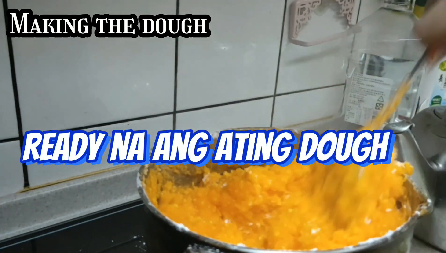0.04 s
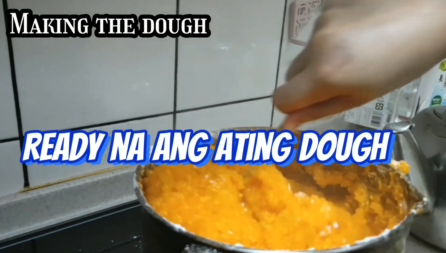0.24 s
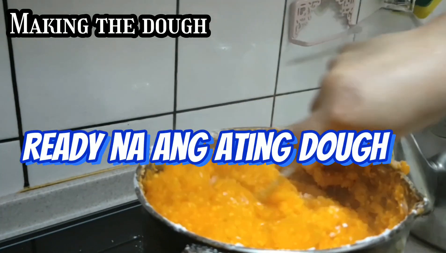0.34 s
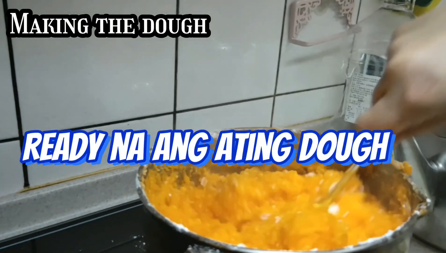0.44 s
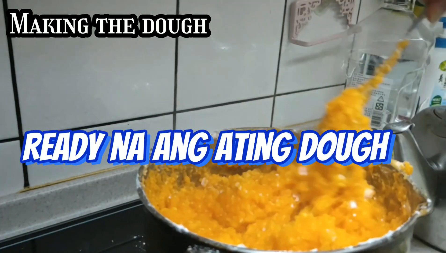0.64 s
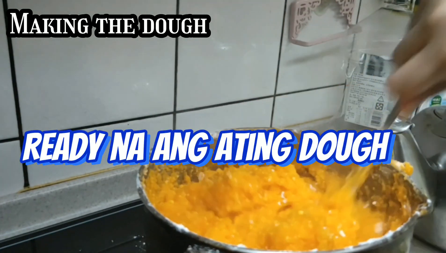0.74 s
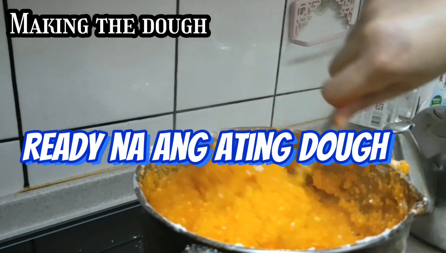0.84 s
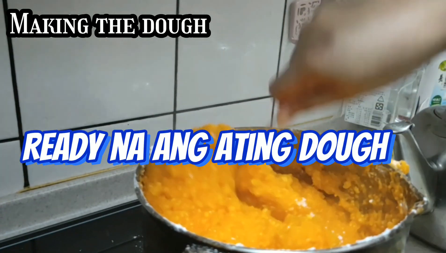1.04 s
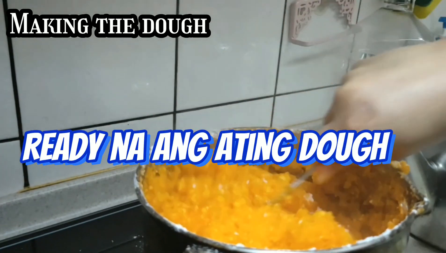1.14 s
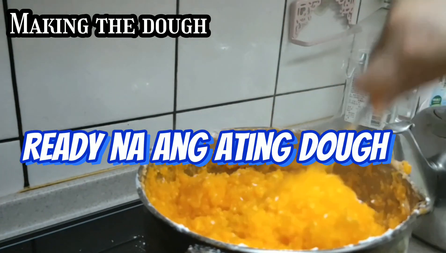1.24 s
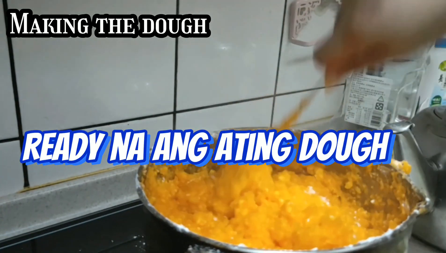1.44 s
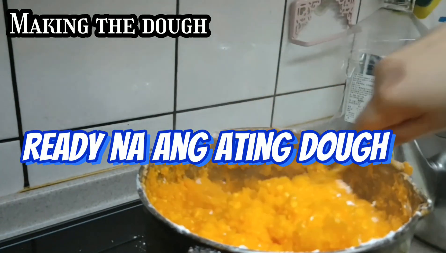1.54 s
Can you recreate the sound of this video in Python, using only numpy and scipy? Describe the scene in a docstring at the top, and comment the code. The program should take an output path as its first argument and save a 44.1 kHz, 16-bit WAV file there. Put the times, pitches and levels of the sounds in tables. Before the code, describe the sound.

A metal spoon stirs stiff dough in a steel pot, close and slightly left. Faint hum and rustle lead to a hard, damped clank at 0.24 s, then duller knocks at 0.3 and 0.4 and a weak pair near 0.57. A bright scrape at 0.76 precedes another hard clank at 0.89; double knock with scraping near 1.19, soft thumps from 1.33, then faint scraping. Short tiled kitchen tail, low rumble.

```python
"""Low hum and soft chatter, then hard knocks: a metal spoon stirs stiff dough in a steel pot on a stove,
close to a phone and a little to its left. Struck modes of the dough-damped wall ring short, the pot
thumps on its stand and short noise bands crunch at the rim; random clicks make the chatter.
Denser clicks through resonances scrape the steel, hum in the pot and rustle in the sticky dough.
Noise makes a brief tail from the small tiled kitchen, low rumble and faint hiss."""
import sys
import numpy as np
from scipy import signal
from scipy.fft import rfft, irfft, next_fast_len
from scipy.io import wavfile

SR = 44100
rng = np.random.default_rng(int(sys.argv[2]) if len(sys.argv) > 2 else 0)


def volts_from_decibels(level):
    """Turn decibel levels (scalar or array-like) into linear amplitude factors."""
    exponent = np.asarray(level, float) / 20
    return 10 ** exponent


def bounce(signal):
    """Save signal as a 16-bit WAV file at the path given by the first command-line argument."""
    frames = np.transpose(np.atleast_2d(signal))
    limited = np.clip(frames, -1, 1)
    pcm = np.round(limited * 32767).astype(np.int16)
    wavfile.write(sys.argv[1], SR, pcm)


N = 70560

# Ring of the pot wall. Each row: nominal mode pitch in Hz, relative level in dB, t60 in s.
WALL_MODES = [(404, -1.5, 0.09), (526, 0, 0.085), (565, -4, 0.035), (650, -10, 0.07), (820, -7, 0.06),
              (905, -6, 0.06), (980, -1, 0.04), (1075, -2, 0.045), (1145, -3.5, 0.051), (1210, 0, 0.045),
              (1320, -4, 0.048), (1490, -7, .045), (1760, -4, .022), (2080, 0, .025)]
# Thump of the full pot on its stand. Each row: nominal mode pitch in Hz, relative level in dB, t60 in s.
STAND_MODES = [(88.4, -9, 0.019), (102.5, 0, 0.21), (116.2, 10, 0.089), (143.4, 4.5, 0.17),
               (193, 1.5, 0.093), (248.4, 2.5, 0.091), (272.2, -5, 0.24), (331, 4.5, 0.095)]
# Treble resonances of steel and dough. Each row: centre in Hz, width in Hz, relative level in dB.
TREBLE_PEAKS = [(5840, 1700, 13.5), (6510, 460, 11.5), (7360, 770, 19), (7360, 770, -9), (10600, 3700, -49),
                (14600, 1300, 8)]
# How much louder each layer stands at the left than at the right. Each entry: layer name, dB.
LEFT_OVER_RIGHT = {"thump": 3.5, "wall": 9.5, "clink": 3.5, "scrape": 3, "stir": 3.5, "drag": 4}


def unit(x):
    """Scaled to rms 1."""
    return x / np.sqrt(np.mean(x ** 2))


def fade(t, t60):
    """Exponential decay: falls 60 dB in t60 s."""
    return volts_from_decibels(-60 * t / t60)


def band(x, lo_hz, hi_hz):
    """Band-pass."""
    return signal.sosfilt(signal.butter(3, [lo_hz, min(hi_hz, .45 * SR)], "band", fs=SR, output="sos"), x)


def peaks(x, table):
    """Sum of resonances driven by x, scaled to rms 1."""
    out = 0
    for hz, width_hz, db in table:
        resonance = signal.lfilter(*signal.iirpeak(hz, hz / width_hz, fs=SR), x)
        out = out + volts_from_decibels(db) * resonance * np.sqrt(1 / width_hz)
    return unit(out)


def pan(left_db):
    """Left and right gains, left_db apart."""
    return volts_from_decibels(np.array([[left_db], [-left_db]]) / 2)


def grit(per_s, spread_db, size=N):
    """Random clicks of either sign; their levels in dB spread exponentially."""
    chance, height = rng.random((size, 2)).T
    level = volts_from_decibels(-spread_db * np.log(height + 1e-9))
    return (chance < per_s / SR) * level * rng.choice([-1., 1.], size) * np.sqrt(SR / per_s)


def pair(make, alike):
    """Two channels that share part of their chance."""
    c = np.clip(alike, 0, 1)
    mid, side = make(), make()
    return np.sqrt((1 + c) / 2) * mid + np.sqrt((1 - c) / 2) * side * np.array([[1], [-1]])


def wide(table, k):
    """Modes as resonances for a steady drive; width in Hz times t60 is k."""
    return [(hz, k / t60, db) for hz, db, t60 in table]


def favour(table, at_hz, off_db, db=0.):
    """The modes raised by db, and weaker by up to off_db away from at_hz."""
    reach_oct = .22
    out = []
    for hz, mode_db, t60 in table:
        away = 1 - np.exp(-(np.log2(hz / at_hz) / reach_oct) ** 2)
        out.append((hz, mode_db + db + off_db * away, t60))
    return out


def ring(table, left_db, unlike_rad, swell_s, whole):
    """Two-channel response of decaying modes, struck at a new place each time."""
    level_scatter_db, pitch_scatter, phase_scatter_rad = 1., .008, .35  # pitch scatter is a fraction
    hz, db, t60 = np.array(table).T[:, :, None]
    level, pitch, between, phase = rng.standard_normal((len(table), 4)).T[:, :, None]
    t = np.arange(SR // 4) / SR
    body = volts_from_decibels(db + level_scatter_db * level) * fade(t, t60) * (1 - np.exp(-t / swell_s))
    w = 2 * np.pi * hz * (1 + pitch_scatter * pitch)
    out = []
    for side in (-1, 1):
        start = phase_scatter_rad * phase + side * unlike_rad * between / 2
        out.append((body * np.sin(w * t + start)).sum(axis=0))
    return np.array(out) * pan(left_db) / np.sqrt(np.sum(volts_from_decibels(np.array(whole)[:, 1]) ** 2))


def crunch():
    """Spoon on rim: modes too dense to tell apart, a fast-dying band of noise for each cluster."""
    # Clusters of modes. Each row: centre in Hz, width in Hz, relative level in dB, t60 in s.
    clusters = [(1567, 530, 3.5, 0.038), (2010, 514, 10, 0.024), (2670, 220, 0, 0.03),
                (3163, 280, 0, 0.038), (4270, 1300, -5, 0.052), (5054, 520, -1.5, 0.036),
                (6280, 590, -2.5, 0.032), (7000, 370, 2.5, 0.03), (7790, 1700, -3, 0.023),
                (11200, 3900, -19, 0.051), (13300, 2230, -28, 0.045)]
    t = np.arange(SR // 4) / SR
    noise = pair(lambda: rng.standard_normal(len(t)), 0.33)
    out = 0
    for hz, width_hz, db, t60 in clusters:
        out = out + volts_from_decibels(db) * unit(band(noise, hz - width_hz / 2, hz + width_hz / 2)) * fade(t, t60)
    return out * np.clip(t / 0.00027, 0, 1) * pan(LEFT_OVER_RIGHT["clink"]) / 2


def knocks():
    """Each blow and the chatter of clicks after it ring wall, stand and rim."""
    # Blows of the spoon. Each row: start in seconds, level in dB, then relative levels in dB of thump,
    # upper wall modes, crunch and chatter, chatter t60 in s, then the pitches favoured in the thump,
    # the lower wall and the upper wall in Hz.
    blows = [(-.01, -53, 5, -2, -9, -3.5, 0.22, 250, 405, 990),
             (0.2389, -13.5, -9, -0.5, -8.5, -23.5, 0.19, 303, 573, 1376),
             (0.3033, -41, 8, -2, -18, -1, 0.037, 264, 405, 920),
             (0.3066, -24.5, 5, 1.5, -10.5, -11.5, 0.11, 277, 520, 1230),
             (0.3933, -23.5, 3.5, 2, -26.5, -10, 0.053, 172.4, 530, 1090),
             (0.5642, -34, 8, 4, -15, -24, 0.085, 250, 405, 930),
             (0.571, -40.5, 4.5, -3, -12, -12, .12, 320, 405, 1410),
             (.774, -47, -2, -25, -21, 3, 0.11, 151, 564, 1800),
             (0.8883, -13, -10, 1, -4.5, -27, 0.12, 138, 450, 1066),
             (.927, -38.5, -5, 3, -12, 11, 0.035, 260, 527, 980),
             (0.9333, -28.5, 13.5, 10, -27.5, -26, 0.22, 264, 527, 870),
             (1.1842, -30, -46, 3.5, -19, -16.5, 0.082, 120, 524, 1210),
             (1.188, -23, -7.5, 0, -21, -8, 0.032, 123.6, 405, 1200),
             (1.209, -38.5, 8.5, 9.5, -34, -5.5, 0.049, 107, 545, 900),
             (1.3257, -39.5, 12.5, -18, -26, -19.5, 0.096, 265, 405, 934),
             (1.353, -48, 9, -26.5, -26, -21, 0.093, 265, 405, 930),
             (1.374, -55, 13, -26, -29, -13.5, 0.067, 247, 405, 930)]
    split_hz = 730  # between lower and upper wall modes
    lower = [m for m in WALL_MODES if m[0] < split_hz]
    upper = [m for m in WALL_MODES if m[0] > split_hz]
    lead = SR // 10  # room for a blow before time zero
    out = np.zeros((2, N + SR))
    t = np.arange(SR // 3) / SR
    for (s, db, thump_db, upper_db, crunch_db, chatter_db, chatter_t60,
         thump_hz, lower_hz, upper_hz) in blows:
        modes = favour(lower, lower_hz, -5) + favour(upper, upper_hz, -10, upper_db)
        chatter = volts_from_decibels(chatter_db) * grit(2500, 3.23, size=len(t)) * fade(t, chatter_t60)
        chatter = chatter / np.sqrt(SR * 0.0015)
        blow = t == 0
        wall = ring(modes, LEFT_OVER_RIGHT["wall"], 0.68, 0.0006, WALL_MODES)
        bright = wall + volts_from_decibels(crunch_db) * crunch()
        # the heavy stand answers late: a slower swell
        stand_modes = favour(STAND_MODES, thump_hz, -12)
        thump = ring(stand_modes, LEFT_OVER_RIGHT["thump"], 0.25, 0.0022, STAND_MODES)
        y = signal.fftconvolve(bright, (blow + chatter)[None], axes=1)
        # chatter drives the stand 1 dB harder than the wall
        y = y + volts_from_decibels(thump_db) * signal.fftconvolve(thump, (blow + volts_from_decibels(1) * chatter)[None], axes=1)
        i = lead + int(s * SR)
        out[:, i:i + y.shape[1]] += volts_from_decibels(db) * y[:, :out.shape[1] - i]
    return out[:, lead:lead + N]


def stirring():
    """The drag shakes the pot on its stand, hums in the wall and tears the sticky dough: filtered clicks."""
    # Course of the stirring. Each row: time in seconds, then levels in dB of the stand's rumble,
    # the pot's lower hum, its upper hum, the rustle of the dough and the treble of that rustle.
    course = np.array([(0, -80, -53.5, -56.5, -65.5, -65.5), (0.069, -65.5, -71.5, -64.5, -62, -60.5),
                       (.11, -71, -97, -80, -59, -59.5), (0.218, -78, -69.5, -90, -62.5, -57.5),
                       (.3, -50, -52, -53, -71, -63), (.38, -60, -60, -59, -61.5, -61),
                       (.42, -55, -56, -56, -61, -75), (0.453, -54, -57, -61, -55, -76),
                       (.51, -57, -48.5, -61, -68, -67.5), (0.554, -57.5, -59, -75, -64, -60.5),
                       (0.628, -53.5, -57.5, -62, -64.5, -68), (0.698, -74, -80, -86, -75, -72),
                       (.74, -87, -82, -80, -64.5, -114), (.86, -67, -84, -65.5, -63, -55.5),
                       (0.986, -42.5, -48, -61, -62, -62.5), (1.023, -57.5, -58.5, -58, -65.5, -68),
                       (1.06, -51.5, -54.5, -49.5, -61, -56), (1.109, -64, -70.5, -58, -64, -64),
                       (1.125, -91, -98, -54, -65.5, -58), (1.171, -81, -92, -57, -58, -58.5),
                       (1.28, -58.5, -58, -64, -65, -59.5), (1.32, -82, -63, -59, -63, -64),
                       (1.383, -65, -56, -79, -68.5, -85), (1.41, -70.5, -81.5, -77.5, -81, -72.5),
                       (1.453, -67, -62, -100.5, -87, -72), (1.469, -71, -103, -71, -69, -70),
                       (1.522, -61, -80, -65.5, -70, -60), (1.6, -80, -90, -76, -69, -50)])
    t = np.arange(N) / SR

    def pot(alike, lo_hz, hi_hz):
        """One range of the pot's modes under steady drag, band-passed twice."""
        x = peaks(pair(lambda: grit(900, 1.0), alike), wide(STAND_MODES + WALL_MODES, 7.2))
        return unit(band(band(x, lo_hz, hi_hz), lo_hz, hi_hz))

    rumble, lower_hum, upper_hum = pot(1.0, 55, 254), pot(0.61, 226, 710), pot(0.14, 665, 1595)
    rustle = unit(band(pair(lambda: grit(3400, 0.84), .15), 1740, 3100))
    treble = peaks(pair(lambda: grit(5000, 0.74), 0.11), TREBLE_PEAKS)
    out = 0
    for k, x in enumerate([rumble, lower_hum, upper_hum, rustle, treble]):
        out = out + x * volts_from_decibels(np.interp(t, course[:, 0], course[:, k + 1]))
    return pan(LEFT_OVER_RIGHT["stir"]) * out


def room_rumble():
    """Low room rumble: twice band-passed noise, nearly alike at both sides."""
    noise = pair(lambda: rng.standard_normal(N), 0.95)
    return volts_from_decibels(-67.5) * unit(band(band(noise, 36, 210), 36, 210))


def hiss():
    """Faint broad noise, independent left and right."""
    return volts_from_decibels(-87.5) * unit(band(rng.standard_normal((2, N)), 25, 9000))


def port_air():
    """Air on the microphone ports: noise at the bottom of hearing, nearly alike at both."""
    return volts_from_decibels(-77.5) * unit(band(pair(lambda: rng.standard_normal(N), 0.93), 18, 41))


def kitchen(x):
    """Tiles return a short, dulled tail of decaying noise, different at each port."""
    t60_s, tail_db, top_hz, rise_s = 0.24, -16.5, 5240, 0.011
    t = np.arange(SR // 2) / SR
    tail = band(rng.standard_normal((2, len(t))), 250, top_hz) * fade(t, t60_s) * np.clip(t / rise_s, 0, 1)
    tail = tail / np.sqrt(np.sum(tail ** 2) / 2)
    return volts_from_decibels(tail_db) * signal.fftconvolve(x.mean(axis=0)[None], tail, axes=1)[:, :N]


def scrapes():
    """The spoon's edge drags over steel: dense slips through its resonances and the pot's body."""
    # Strokes. Each row: start, rise, hold and t60 in seconds, level in dB, treble over middle in dB,
    # then pot wall and stand over the slips (middle and treble together) in dB.
    strokes = [(0.156, 0.024, 0.027, 0.036, -51.5, 53, -46, -40),
               (0.3, 0.0032, 0.039, 0.029, -50.5, 2, 9, 16.5),
               (0.332, 0.0011, 0.016, 0.027, -40, 6.5, -26, -20),
               (0.422, 0.0014, 0.04, 0.16, -57.5, 9, 3.5, 4),
               (0.52, 0.032, 0.0056, 0.13, -53.5, 1, -2.5, -14),
               (0.565, 0.0026, 0.0056, 0.22, -62, -9, 8.5, 16.5),
               (0.762, 0.0056, 0.0055, 0.25, -32.5, -3.5, -15, -11),
               (0.924, 0.0037, 0.034, 0.064, -43.5, -1.5, 2.5, 6),
               (1.181, 0.0012, 0.024, 0.077, -42, 7, 5.5, -5),
               (1.211, 0.021, 0.01, 0.077, -42.5, 3, 2, -13),
               (1.322, 0.0047, 0.052, 0.038, -73, 1.5, 4, 15.5),
               (1.459, 0.087, 0.078, 0.27, -48, 4.5, -33.5, -33)]
    # Middle resonances. Each row: centre in Hz, width in Hz, relative level in dB.
    middle_peaks = [(1510, 700, -31), (1936, 360, 1.5), (2610, 1300, 4), (3330, 490, -5.5)]
    t = np.arange(N) / SR
    slips = pair(lambda: grit(7000, 2.1), 0.15)
    middle = unit(band(peaks(slips, middle_peaks), 560, 5500))
    treble = peaks(slips, TREBLE_PEAKS)
    drag = pair(lambda: grit(900, 2.15), 0.75)
    wall, stand = (unit(band(peaks(drag, wide(m, 7.)), 184, 1320)) for m in (WALL_MODES, STAND_MODES))
    out = 0
    for s, rise, hold, t60, db, treble_db, wall_db, stand_db in strokes:
        env = np.clip((t - s) / rise, 0, 1) ** 2 * fade(np.maximum(t - s - rise - hold, 0), t60)
        edge = (middle + volts_from_decibels(treble_db) * treble) / np.hypot(1, volts_from_decibels(treble_db))
        body = volts_from_decibels(wall_db) * wall + volts_from_decibels(stand_db) * stand
        stroke = edge * pan(LEFT_OVER_RIGHT["scrape"]) + body * pan(LEFT_OVER_RIGHT["drag"])
        out = out + env * volts_from_decibels(db) * stroke
    return out


def scene():
    """Spoon, pot, dough, room tail, rumble and faint hiss; only knocks and scrapes feed the tail."""
    hits = knocks() + scrapes()
    return hits + kitchen(hits) + stirring() + room_rumble() + hiss()


def top_cut(x):
    """Nothing passes above the cut-off."""
    return signal.sosfilt(signal.butter(12, 16120, fs=SR, output="sos"), x)


def record(dry):
    """Microphone colour: low cut, narrow dip, duller treble; the right port is later and brighter."""
    cut_hz, top_hz, right_lag_s = 46, 15700, .00011
    size = next_fast_len(N + 512)
    hz = np.fft.rfftfreq(size, 1 / SR)

    def step(at_hz, width_hz):
        """Smooth rise from 0 to 1 around at_hz."""
        return 1 / (1 + np.exp((at_hz - hz) / width_hz))

    dip_db = -3.5 * np.exp(-((hz - 4090) / 150) ** 2)
    shelf_db = -2.5 * step(9100, 195)
    colour = volts_from_decibels(dip_db + shelf_db - 60 * step(top_hz, 60))
    right = volts_from_decibels(1 * step(6170, 570)) * np.exp(-2j * np.pi * hz * right_lag_s)
    x = signal.sosfilt(signal.butter(3, cut_hz, "high", fs=SR, output="sos"), dry)
    x = x + port_air()
    ports = np.array([np.ones_like(right), right])
    mix = irfft(rfft(x, size) * colour * ports, size)[:, :N]
    return top_cut(mix)


dry = scene()
out = record(dry)
bounce(out)
```